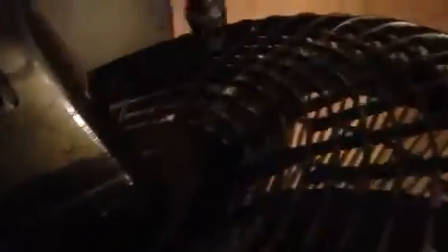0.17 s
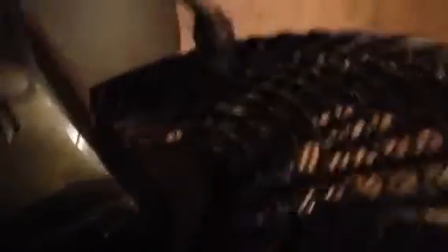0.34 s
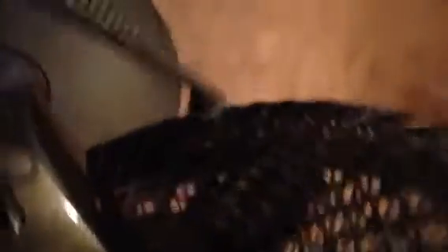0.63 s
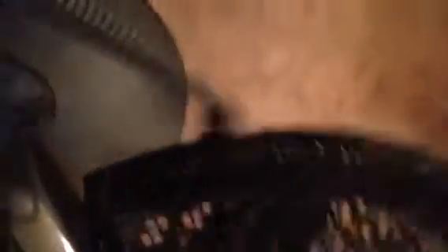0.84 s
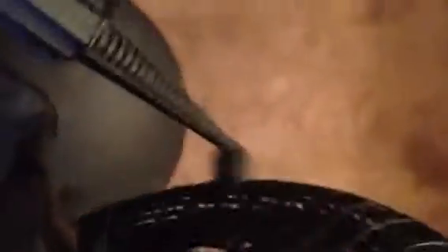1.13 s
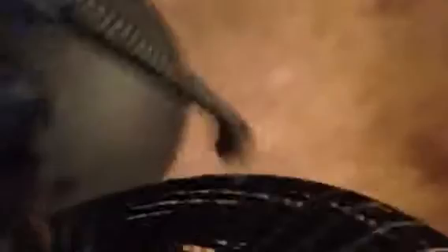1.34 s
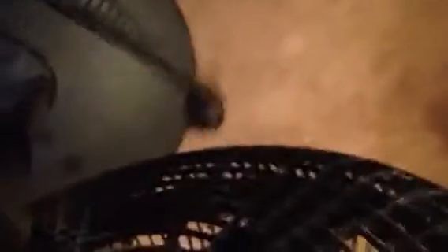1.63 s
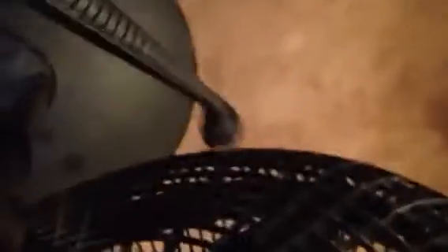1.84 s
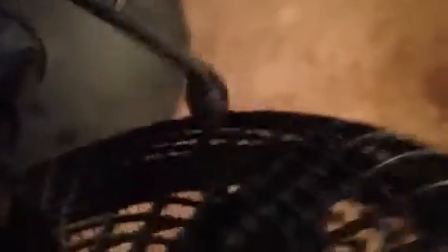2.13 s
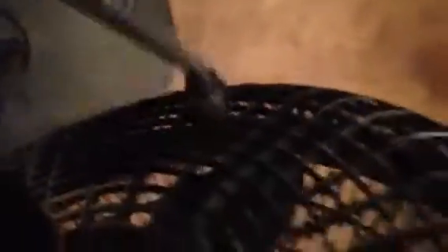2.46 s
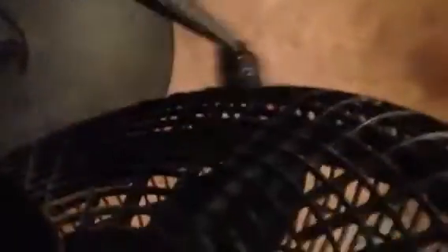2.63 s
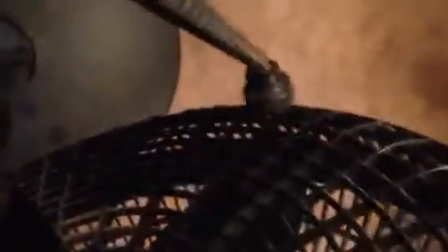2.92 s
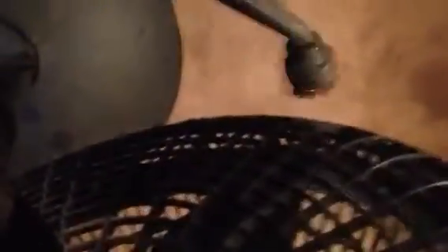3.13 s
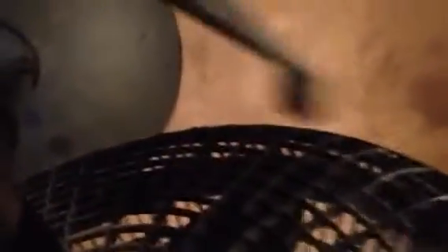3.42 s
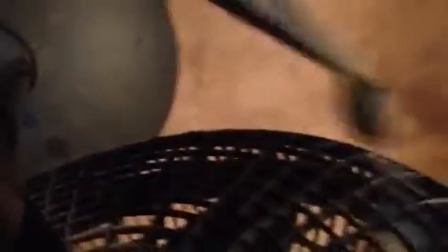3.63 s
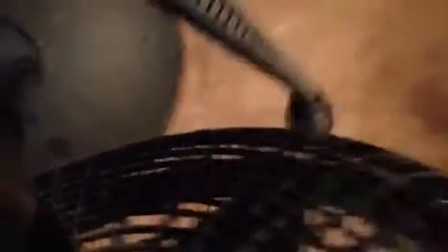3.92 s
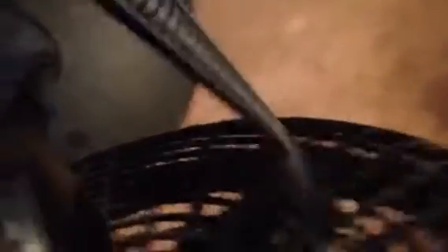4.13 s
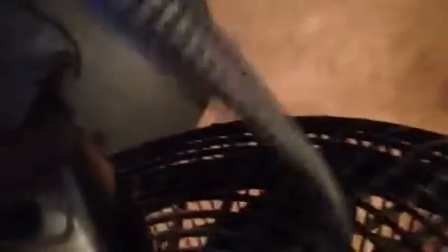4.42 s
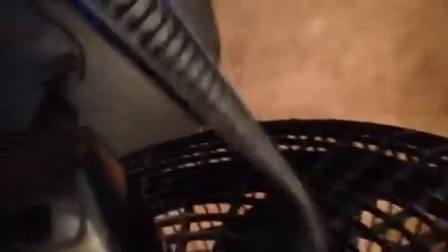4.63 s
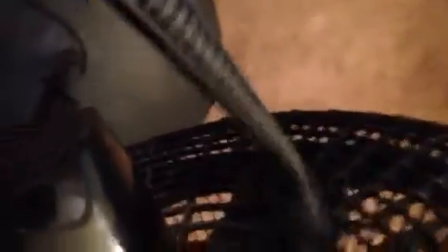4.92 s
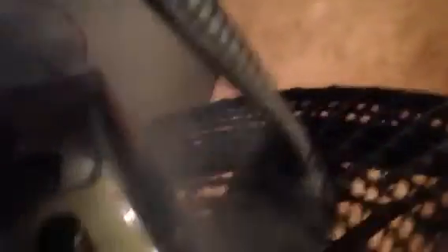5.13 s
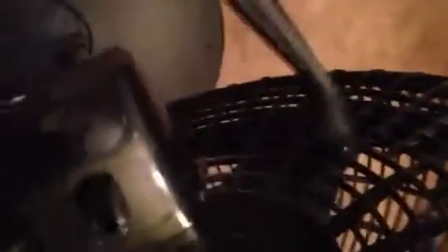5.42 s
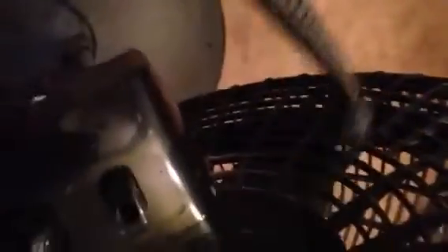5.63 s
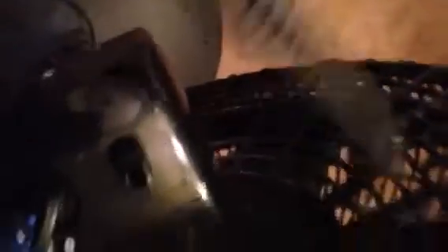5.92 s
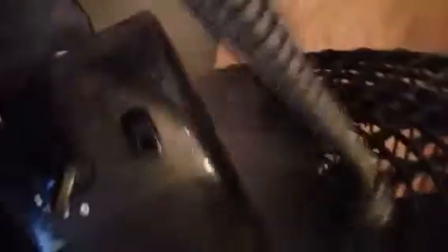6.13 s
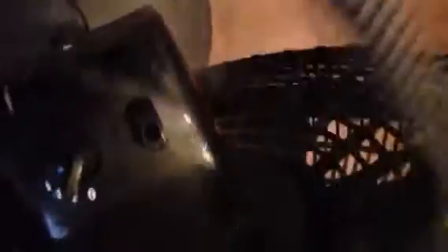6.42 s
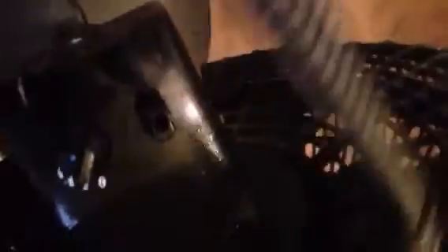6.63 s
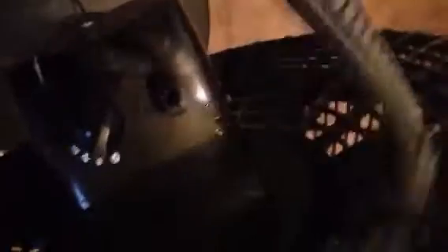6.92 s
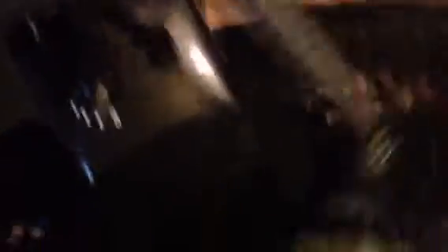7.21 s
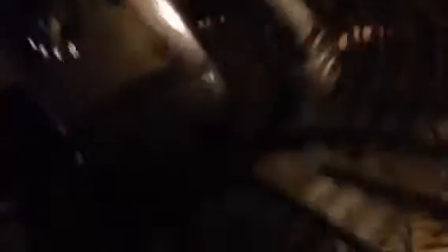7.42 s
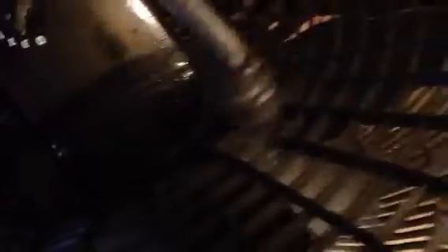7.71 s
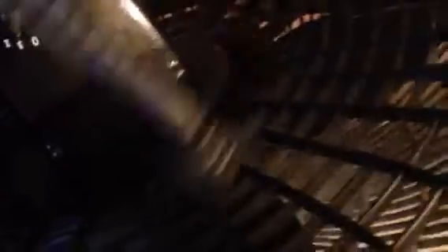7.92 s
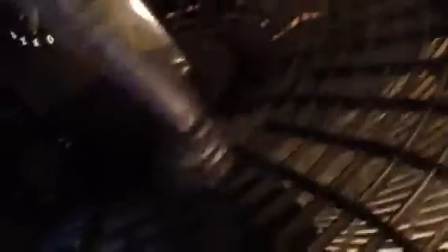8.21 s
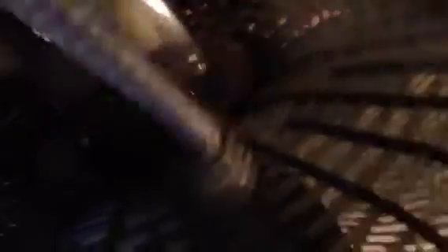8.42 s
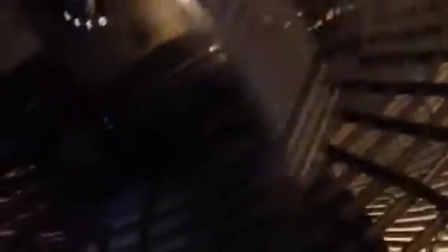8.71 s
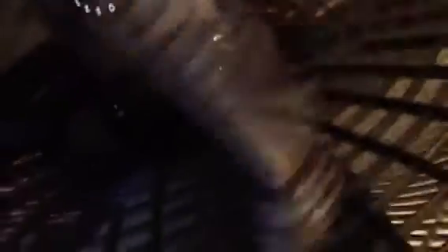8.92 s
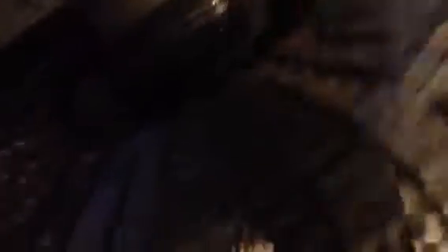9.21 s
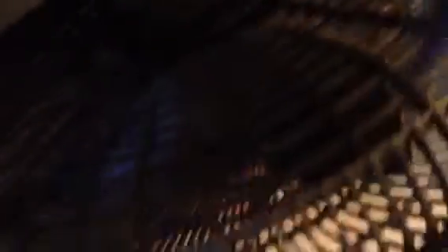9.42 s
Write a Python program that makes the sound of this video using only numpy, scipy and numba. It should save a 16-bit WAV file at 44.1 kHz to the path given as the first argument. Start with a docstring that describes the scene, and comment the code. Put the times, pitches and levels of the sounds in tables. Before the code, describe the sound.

Close to the microphone in a small room, a steam nozzle hisses without a break against a fan grille, with a high fluttering ring from the wires. Short squeals and cracks of larger drops break through as it moves. A run of quick, hollow gusts comes around the middle, followed by a cluster of squeals and then several lower, rough blasts against the fan housing.

```python
"""A steam cleaner jets wet steam over a fan's wire grille, close up in a small room; mono.
From the start the jet hisses, crackles with droplets and rings near 5 kHz at the wires, over a faint
draught; a nearby surface colours it as the nozzle moves. From 0.3 s wire edges squeal now and then;
from 1.3 s larger drops crack. At 4.5-6.3 s hollows of the fan roar in quick gusts. Squeals crowd in
at 7.2-8.5 s, and the jet buffets the housing hardest at 8.4-9.2 s."""
import sys
import numpy as np
from scipy import signal
from scipy.fft import rfft, irfft, next_fast_len
from scipy.io import wavfile
from scipy.ndimage import map_coordinates
from numba import njit

SR = 44100
rng = np.random.default_rng(int(sys.argv[2]) if len(sys.argv) > 2 else 0)


def master(y):
    """Save y as 16-bit WAV."""
    cut = np.clip(np.atleast_2d(y).T, -1, 1)
    pcm = np.round(cut * 32767)  # scale
    wavfile.write(sys.argv[1], SR, pcm.astype(np.int16))


N = 422037
TIME = np.arange(N) / SR


def undb(db):
    """Decibels to gain."""
    return 10 ** (np.asarray(db) / 20)


def unit(x):
    """Scale to rms 1."""
    return x / np.sqrt(np.mean(x ** 2))


def curves(table):
    """Rows of (time_s, values...) to one linearly interpolated curve per value."""
    time_s, *columns = np.transpose(table)
    return [np.interp(TIME, time_s, column) for column in columns]


def walk(rate_hz):
    """Random drift, rms 1, with rate_hz new values a second."""
    steps = rng.standard_normal(N // 8)
    return unit(np.interp(TIME * rate_hz, np.arange(len(steps)), steps))


def gate(t, start_s, end_s, rise_s, fall_s):
    """Soft-edged on/off window."""
    return (1 + np.tanh((t - start_s) / rise_s)) * (1 - np.tanh((t - end_s) / fall_s)) / 4


def around(start_s, end_s):
    """Sample mask of an event and its edges."""
    return (TIME > start_s - .05) & (TIME < end_s + .08)


def swells(table, rise_s, fall_s):
    """Level offset in dB, zero between events."""
    offset_db = np.zeros(N)
    for start_s, end_s, change_db in table:
        span = around(start_s, end_s)
        offset_db[span] += change_db * gate(TIME[span], start_s, end_s, rise_s, fall_s)
    return offset_db


def colour(x, spectrum):
    """Filter by (freq_hz, gain_db) points, rolling off past the ends; rms 1."""
    hz, db = np.transpose(spectrum)
    size = next_fast_len(N)
    log_hz = np.log(np.fft.rfftfreq(size, 1 / SR) + 1)
    outside = np.abs(log_hz - np.clip(log_hz, np.log(hz[0]), np.log(hz[-1])))
    gain = undb(np.interp(log_hz, np.log(hz), db)) * np.exp(-2 * outside)
    return unit(irfft(rfft(x, size) * gain, size)[:N])


def band_pass(x, low_hz, high_hz):
    """Keep one band; rms 1."""
    sos = signal.butter(2, (low_hz, high_hz), "band", fs=SR, output="sos")
    return unit(signal.sosfilt(sos, x))


@njit
def resonate(x, centre_hz, width_hz):
    """State-variable band-pass; gain 1 at its moving centre."""
    y = np.empty(len(x))
    band_state, low_state = 0., 0.
    for i in range(len(x)):
        g = np.tan(np.pi * centre_hz[i] / SR)
        damping = width_hz / centre_hz[i]
        band = (band_state + g * (x[i] - low_state)) / (1 + g * (g + damping))
        band_state = 2 * band - band_state
        low_state += 2 * g * band
        y[i] = damping * band
    return y


def eddies(x, band_hz, depth_db):
    """Eddies of some 20 ms swell and fade narrow bands independently; rms 1."""
    hz, frames_s, cells = signal.stft(x, SR, nperseg=1024, noverlap=768)
    chance = rng.standard_normal(cells.shape)
    grid = np.meshgrid(hz / band_hz, np.arange(len(frames_s)) / 3, indexing="ij")
    swell = unit(map_coordinates(chance, grid, order=1, mode="mirror"))
    cells *= undb(depth_db * np.clip(swell, -2, 2))
    return unit(signal.istft(cells, SR, nperseg=1024, noverlap=768)[1][:N])


def spray(drops_per_s, drops_db):
    """Turbulent gas with droplets: many tiny impacts, a few larger."""
    sizes = undb(np.minimum(5 * rng.standard_exponential(N), 13))
    hits = rng.random(N) < drops_per_s / SR
    drops = hits * sizes * np.sign(rng.standard_normal(N))
    return unit(rng.standard_normal(N) + undb(drops_db) * unit(drops))


def draught():
    """Moving air rumbles softly and unevenly."""
    # draught strength: time_s, level_db
    strength = [(0, -54), (.45, -53), (.77, -57.5), (1.25, -53), (1.47, -49.5), (1.75, -54), (3.06, -58),
                (3.2, -49.5), (4.05, -51.5), (4.4, -53.5), (5.2, -55), (5.55, -49.5), (5.87, -49.5),
                (6.1, -56), (7.3, -53.5), (8.25, -58.5), (9.15, -53.5), (9.57, -58)]
    # rumble spectrum: freq_hz, gain_db
    spectrum = [(18, -30), (30, -14), (45, -2.5), (100, -0.5), (190, 3.5), (290, 0.5), (400, 0), (800, -4)]
    level_db, = curves(strength)
    air = eddies(colour(rng.standard_normal(N), spectrum), band_hz=69, depth_db=3.5)
    return air * undb(level_db + 2.7 + 1.35 * walk(24))


def room(x, t60_s=0.15, tail_db=-20):
    """The walls add a short diffuse tail."""
    t = TIME[:SR // 2]
    tail = rng.standard_normal(len(t)) * np.exp(-np.log(1000) * t / t60_s) * (t > .004)
    return x + undb(tail_db) * signal.fftconvolve(x, tail / np.linalg.norm(tail))[:N]


def near_surface(x, lag_s=0.000912, sway=0.14):
    """One close reflection whose path moves with the hand: a sweeping comb."""
    # reflection, stronger with the nozzle among the bars: time_s, echo_db
    closeness = [(0, -15.5), (7.1, -18.5), (7.4, -13), (9.57, -16.5)]
    echo_db, = curves(closeness)
    lag_samples = lag_s * SR * np.exp(sway * walk(4))
    echo = map_coordinates(x, [np.arange(N) - lag_samples], order=3)
    return (x + undb(echo_db) * echo) / np.hypot(1, undb(echo_db))


def spits(decay_s=0.0039):
    """Drops burst on the wires with short bright cracks."""
    # larger drops from the nozzle: start_s, level_db
    drops = [(1.328, -29), (1.687, -24), (4.267, -19), (4.693, -19), (6.394, -23), (7.197, -19),
             (7.348, -18), (8.586, -22)]
    envelope = np.zeros(N)
    for start_s, level_db in drops:
        age_s = TIME - start_s
        envelope += undb(level_db + 4.5) * (age_s >= 0) * np.exp(-np.abs(age_s) / decay_s)
    return envelope * unit(resonate(rng.standard_normal(N), np.full(N, 5200.), width_hz=4500.))


def squeals(base_width_hz=330., wander=.016, flutter_db=1.6):
    """Narrow unsteady edge tones glide as the nozzle slides past wires."""
    # jet on a wire edge: start_s, end_s, first_hz, last_hz, level_db
    glides = [(0.343, 0.436, 5460, 5400, -20.5), (1.627, 1.7, 5650, 5170, -23.5),
              (2.225, 2.302, 5530, 5550, -21), (3.138, 3.2, 4900, 4850, -22), (3.54, 3.58, 4900, 5000, -26),
              (3.697, 3.777, 5250, 6050, -23.5), (4.082, 4.169, 5350, 4760, -18.5),
              (4.513, 4.586, 5200, 5300, -24.5), (7.204, 7.31, 5100, 5330, -20),
              (7.298, 7.45, 4630, 4200, -30), (7.666, 7.73, 2900, 2800, -26.5),
              (7.75, 7.93, 4670, 4970, -29), (8.09, 8.193, 4700, 4700, -28), (8.24, 8.48, 4420, 4250, -31)]
    out = np.zeros(N)
    steam = rng.standard_normal(N)
    waver = 1 + wander * walk(60)
    for start_s, end_s, first_hz, last_hz, level_db in glides:
        span = around(start_s, end_s)
        pitch_hz = np.interp(TIME[span], (start_s, end_s), (first_hz, last_hz)) * waver[span]
        # harder blow: more turbulence, broader tone
        width_hz = base_width_hz * np.exp(0.086 * max(level_db + 28, 0))
        tone = resonate(resonate(steam[span], pitch_hz, width_hz), pitch_hz, 2 * width_hz)
        envelope = gate(TIME[span], start_s, end_s, rise_s=0.0086, fall_s=0.013)
        out[span] += unit(tone) * undb(level_db) * envelope
    return out * undb(flutter_db * walk(35))


def gusts(throat_hz=(860., 1800.), throat_db=-10.5):
    """Each hollow roars in its own band; deep ones also sound the housing's throat."""
    # jet straight into a hollow of the fan: start_s, end_s, low_hz, high_hz, level_db
    hollows = [(1.318, 1.363, 4520, 6370, -21), (1.443, 1.51, 5600, 7100, -23),
               (4.542, 4.592, 905, 2300, -22), (4.71, 4.8, 1390, 4370, -22),
               (4.915, 5.004, 1400, 4200, -20), (5.075, 5.122, 1770, 4440, -17),
               (5.155, 5.301, 2500, 4200, -19.5), (5.999, 6.036, 800, 2900, -22),
               (6.037, 6.079, 1950, 3600, -14.5), (6.097, 6.14, 1880, 3400, -20.5),
               (6.143, 6.285, 1790, 3470, -18.5), (7.576, 7.636, 1200, 2380, -25),
               (7.834, 7.97, 1800, 2490, -29.5)]
    out = np.zeros(N)
    steam = eddies(spray(drops_per_s=400, drops_db=-19), band_hz=120, depth_db=1.8)
    for start_s, end_s, low_hz, high_hz, level_db in hollows:
        span = around(start_s, end_s)
        roar = band_pass(np.roll(steam, rng.integers(N))[span], low_hz, high_hz)
        throat = band_pass(np.roll(steam, rng.integers(N))[span], *throat_hz)
        deep = low_hz < 3000
        envelope = gate(TIME[span], start_s, end_s, rise_s=0.008, fall_s=0.02)
        out[span] += (roar + deep * undb(throat_db) * throat) * undb(level_db) * envelope
    return out * undb(0.5 * walk(60))


def grille_and_housing(waver_db=0.64):
    """Steam rushes through the grille and roars in the housing, harder at each buffet."""
    # how squarely the jet meets the grille: time_s, level_db
    aim = [(0, -29), (.3, -25.5), (.7, -30), (.9, -29.5), (2.4, -29.5), (3.35, -30), (3.9, -31), (4.9, -26),
           (5.28, -23.5), (5.36, -30), (5.7, -25.5), (5.95, -28.5), (6.4, -30.5), (7.1, -27.5), (7.45, -23),
           (8.05, -30), (9.25, -28.5), (9.57, -30)]
    # jet hits the housing between the bars (+) or slides off (-): start_s, end_s, change_db
    buffets = [(.05, .1, 4), (.12, .22, -8), (.629, .723, 5.5), (.96, 1.08, -5), (1.15, 1.23, -5),
               (1.24, 1.327, 5), (1.452, 1.512, 4.5), (1.72, 1.94, -5), (1.961, 2.04, 5.5),
               (2.045, 2.1, -14), (2.115, 2.215, 4.5), (3.527, 3.617, 6.5), (4.011, 4.081, 5.5),
               (4.535, 4.595, 6), (4.919, 4.989, 5.5), (5.49, 5.53, 6), (5.597, 5.647, 6), (5.986, 6.04, 1),
               (6.19, 6.296, 3.5), (6.63, 6.74, -5), (7.03, 7.08, 3), (7.568, 7.653, 5),
               (7.757, 7.817, 6.5), (7.85, 7.977, 5.5), (8.137, 8.241, 5.5), (8.381, 8.451, 9),
               (8.6, 8.705, 6), (8.845, 8.9, 9.5), (9.144, 9.189, 10), (9.25, 9.34, 3)]
    # grille spectrum: freq_hz, gain_db
    grille = [(700, -7.5), (1300, -7), (1800, 1), (2700, 2), (3300, 0.5), (3900, -1.5), (4500, 0.5),
              (6000, -55)]
    # housing spectrum: freq_hz, gain_db
    housing = [(200, -39), (340, -18), (410, -1), (560, -1), (720, -1.5), (920, -5), (1300, 0.5), (1700, 0),
               (2600, -36)]
    aim_db, = curves(aim)
    buffet_db = swells(buffets, rise_s=.01, fall_s=.015) + waver_db * walk(15)
    rush_db = aim_db + 0.28 * buffet_db
    roar_db = -39.5 + 0.2 * (aim_db - aim_db.mean()) + buffet_db
    rush = colour(spray(drops_per_s=400, drops_db=-7.5), grille)
    rush = eddies(rush, band_hz=139.1, depth_db=2.5)
    roar = colour(spray(drops_per_s=210, drops_db=-8.5), housing)
    roar = eddies(roar, band_hz=86.3, depth_db=2)
    return rush * undb(rush_db + walk(35)) + roar * undb(roar_db + 2.3 * walk(45))


def wire_ring(centre_hz, width_hz=1330., wander=0.055, flutter_db=1.33):
    """The jet breaks on the wires in a narrow band that wavers and flutters."""
    wavering_hz = np.clip(centre_hz * (1 + wander * walk(35)), 2000, 9000)
    steam = spray(drops_per_s=500, drops_db=-5)
    ring = resonate(resonate(steam, wavering_hz, width_hz), wavering_hz, 2 * width_hz)
    ring = unit(ring * undb(flutter_db * walk(70)))
    return eddies(ring, band_hz=130.6, depth_db=2.5)


def jet(tremor_db=0.92, tremor_hz=20, bore_hz=5320., bore_db=-22):
    """Ring, hiss and mist of one sputtering flow; flicks and hand tremor turn the hiss and mist."""
    # wire ring under the jet: time_s, level_db, centre_hz
    ring_track = [(0, -27.5, 4900), (.55, -23.5, 5000), (1.0, -30, 5370), (1.4, -24.5, 5270),
                  (1.95, -24, 5500), (2.5, -34.5, 5500), (2.7, -27, 5350), (3.4, -27.5, 5130),
                  (4.15, -25.5, 5650), (4.95, -27.5, 5430), (5.45, -32.5, 5260), (6.15, -26.5, 5500),
                  (6.45, -28, 5400), (7.1, -28, 5500), (7.65, -25.5, 5130), (8.3, -26, 4900),
                  (9.57, -26.5, 5300)]
    # spray as the nozzle moves over the fan: time_s, hiss_db, mist_db
    spray_track = [(0, -31, -31), (.59, -27.5, -29), (1.01, -29, -30), (1.54, -29.5, -30.5),
                   (1.84, -27.5, -27), (2.35, -24, -26), (2.6, -25, -30), (2.98, -26.5, -29),
                   (3.3, -28, -35), (3.9, -26, -35.5), (4.24, -25.5, -29.5), (5.25, -25.5, -38),
                   (5.35, -30.5, -32), (5.52, -29.5, -34), (5.73, -28, -34), (6.16, -28.5, -32),
                   (8.8, -27.5, -30), (9.57, -30, -36)]
    # spray flicked toward (+) or away from (-) the listener: start_s, end_s, change_db
    flicks = [(.135, .224, -2.5), (.943, 1.033, -5), (1.147, 1.222, -3), (1.337, 1.407, -2.5),
              (1.44, 1.507, 5), (1.532, 1.606, -3.5), (1.706, 1.771, -5.5), (1.786, 1.866, 1),
              (1.871, 1.946, -4), (2.464, 2.544, 3.5), (2.878, 2.978, 2.5), (3.846, 3.951, -5.5),
              (5.198, 5.303, 2), (5.313, 5.488, -3.5), (5.622, 5.677, 2), (6, 6.18, 3), (6.3, 6.39, -1.5),
              (6.41, 6.48, 5), (6.889, 6.979, 5.5), (7.184, 7.244, 3.5), (8.007, 8.117, 3.5),
              (8.486, 8.585, 3.5), (8.6, 8.685, -6), (9.064, 9.164, -3), (9.224, 9.309, 5),
              (9.34, 9.43, -6)]
    # steam hiss spectrum: freq_hz, gain_db
    hiss_spectrum = [(3000, 0), (4300, -0.5), (6000, 2), (7000, 3.5), (8100, 1.5), (9800, 1.5),
                     (11000, -2.5), (12500, -17), (15000, -14)]
    # fine mist spectrum: freq_hz, gain_db
    mist_spectrum = [(8000, -23), (10500, -13.5), (11700, -1), (12600, 0), (13600, -3.5), (15000, -3.5),
                     (16000, 0.5)]
    ring_db, ring_hz = curves(ring_track)
    hiss_db, mist_db = curves(spray_track)
    turn_db = swells(flicks, rise_s=.007, fall_s=.007) + tremor_db * walk(tremor_hz)
    steam = eddies(spray(drops_per_s=880, drops_db=-8.5), band_hz=172.7, depth_db=3.14)
    bore = unit(resonate(steam, np.full(N, bore_hz), width_hz=170.))  # nozzle resonance
    ring = (wire_ring(ring_hz) + undb(bore_db) * bore) * undb(ring_db + 0.63 * walk(14))
    # hiss is less directional than mist
    hiss = colour(steam, hiss_spectrum) * undb(hiss_db + 3 + 0.72 * turn_db)
    mist = colour(steam, mist_spectrum) * undb(mist_db + 1 + turn_db + 1.5 * walk(25))
    flow = ring + (hiss + mist) * undb(.9 * walk(30))
    sputter_db = .4 * walk(300)
    return flow * undb(sputter_db)


def scene():
    """Steam in the room plus draught; identical channels."""
    steam = near_surface(jet() + grille_and_housing()) + gusts() + spits() + squeals()
    mono = room(steam) + draught()
    return np.array([mono, mono])


def record(dry, cutoff_hz=15350):
    """Steep zero-phase low-pass."""
    return signal.sosfiltfilt(signal.ellip(10, .1, 60, cutoff_hz, fs=SR, output="sos"), dry)


dry = scene()
out = record(dry)
master(out)
```